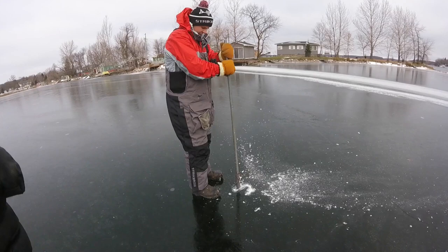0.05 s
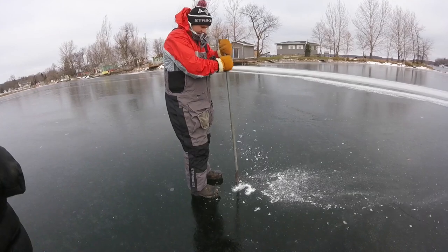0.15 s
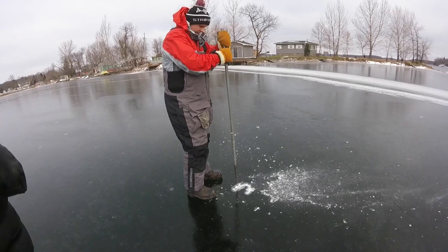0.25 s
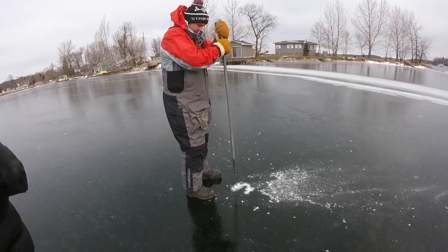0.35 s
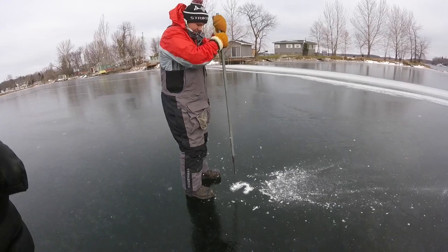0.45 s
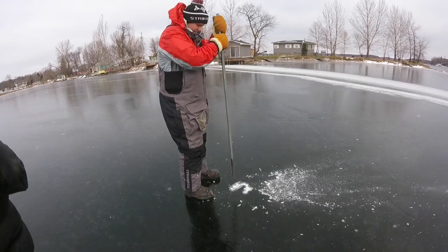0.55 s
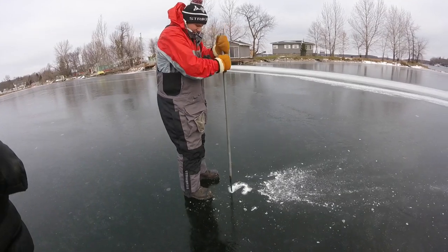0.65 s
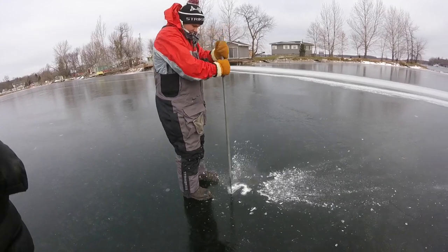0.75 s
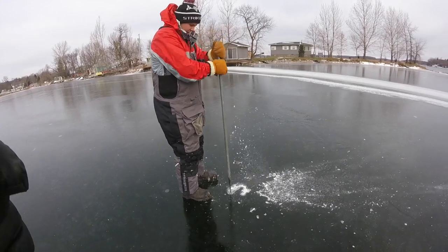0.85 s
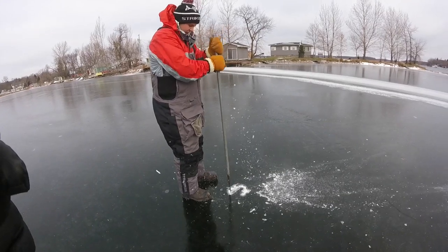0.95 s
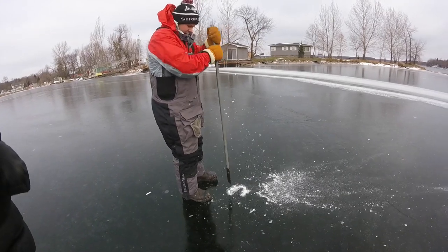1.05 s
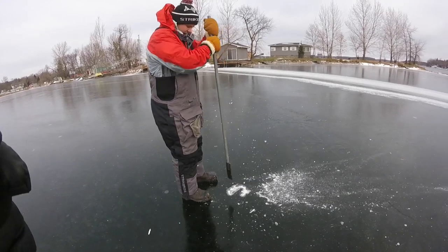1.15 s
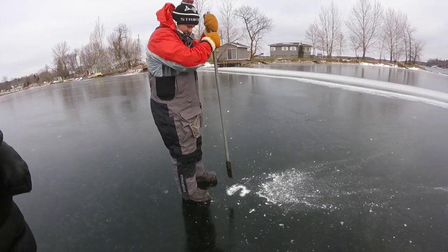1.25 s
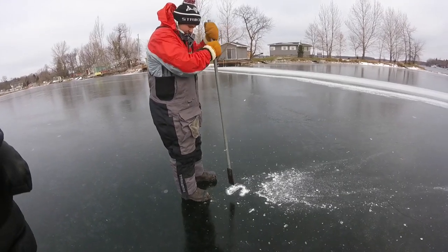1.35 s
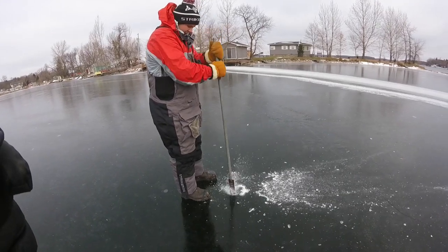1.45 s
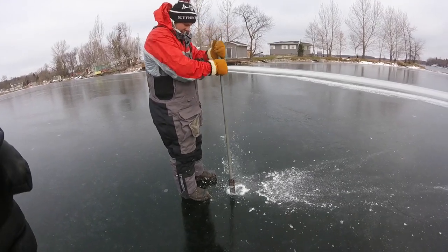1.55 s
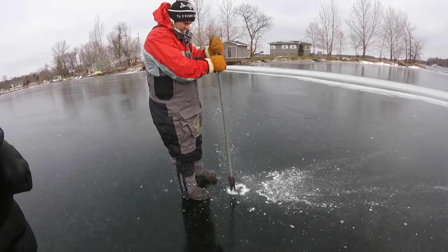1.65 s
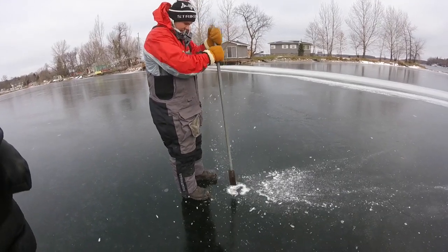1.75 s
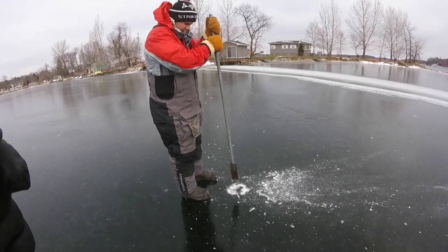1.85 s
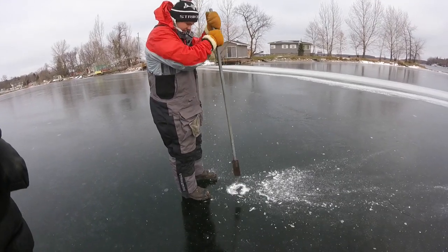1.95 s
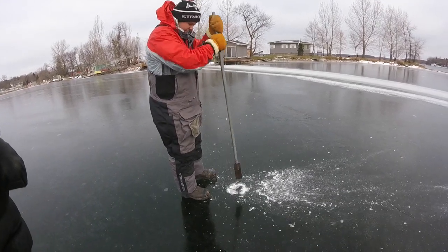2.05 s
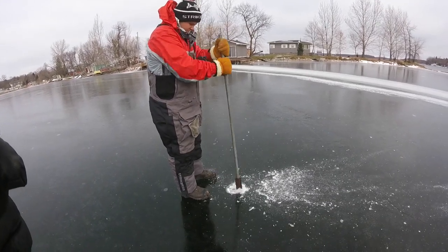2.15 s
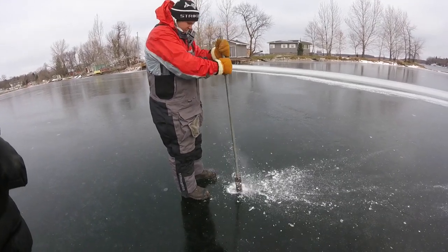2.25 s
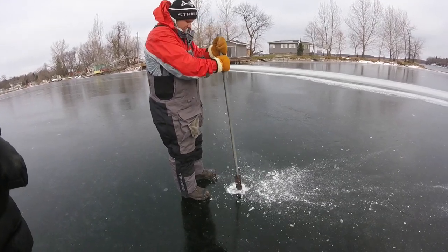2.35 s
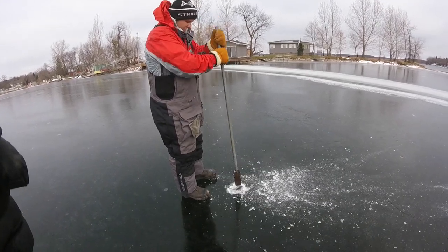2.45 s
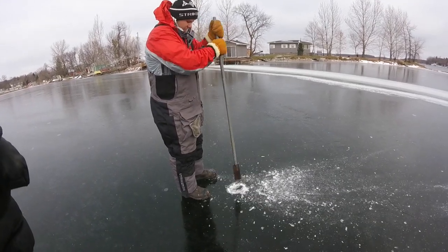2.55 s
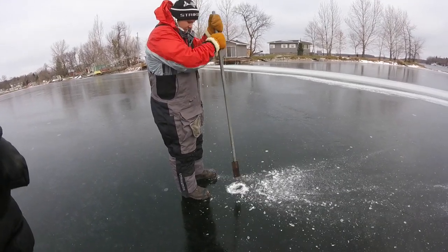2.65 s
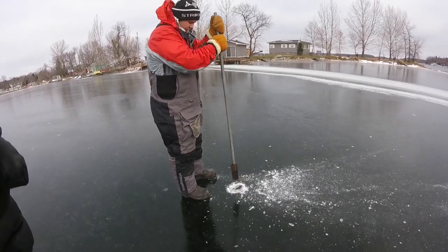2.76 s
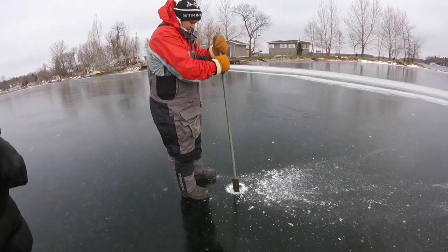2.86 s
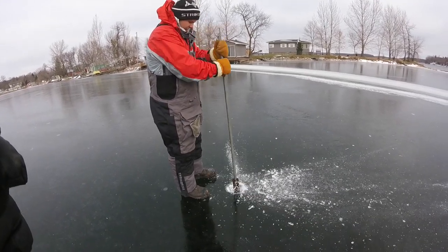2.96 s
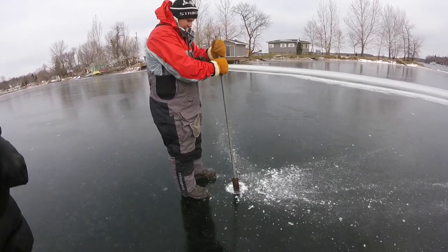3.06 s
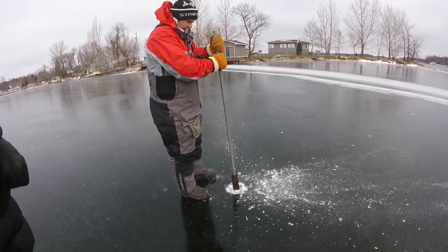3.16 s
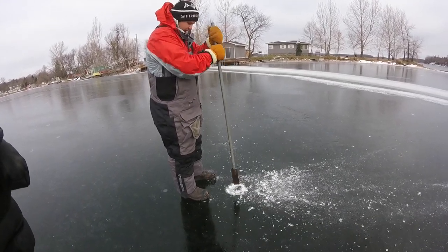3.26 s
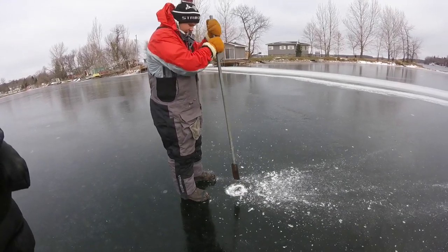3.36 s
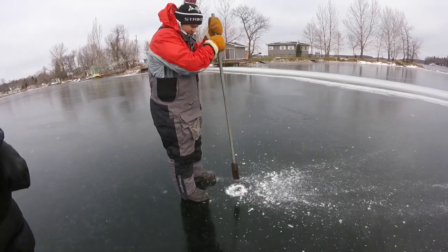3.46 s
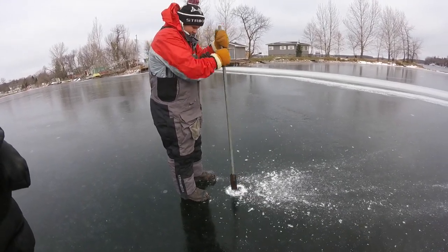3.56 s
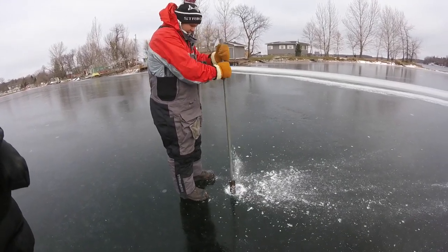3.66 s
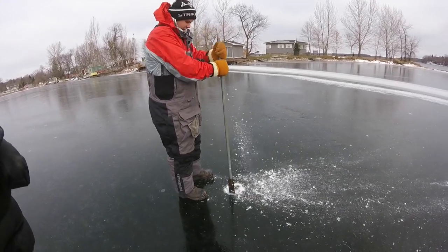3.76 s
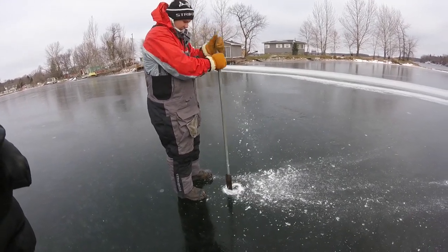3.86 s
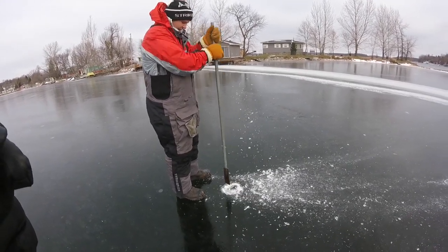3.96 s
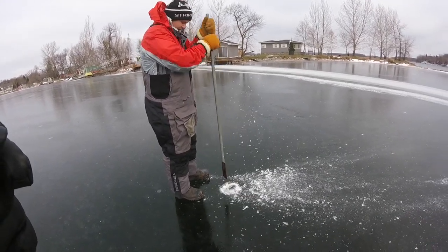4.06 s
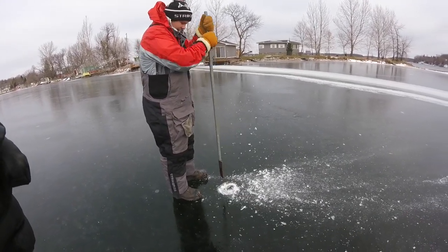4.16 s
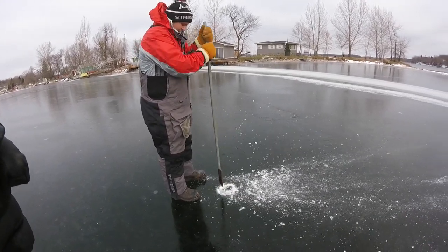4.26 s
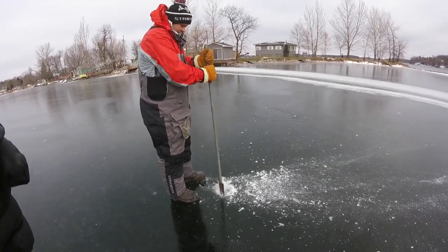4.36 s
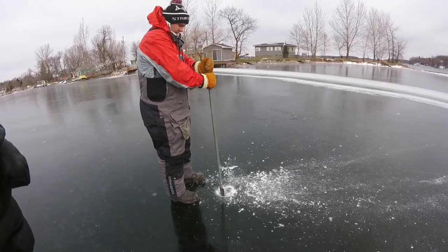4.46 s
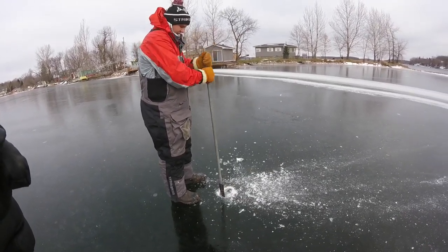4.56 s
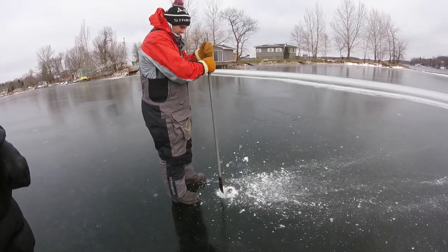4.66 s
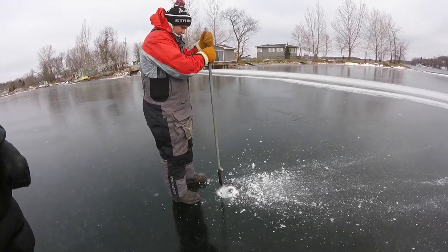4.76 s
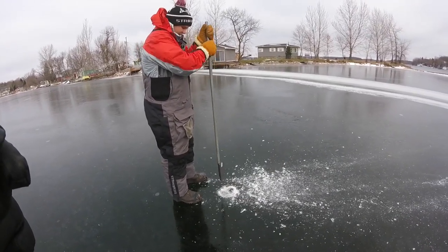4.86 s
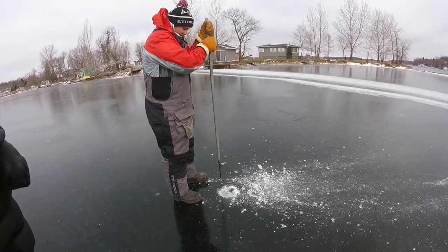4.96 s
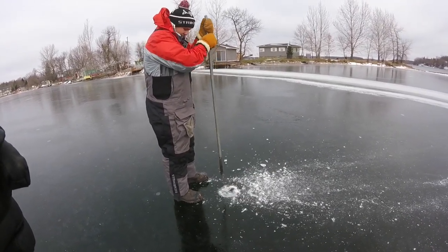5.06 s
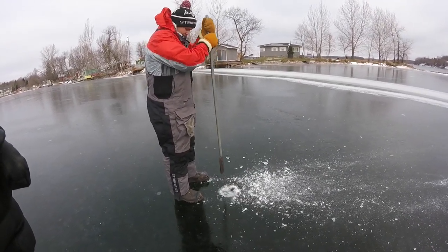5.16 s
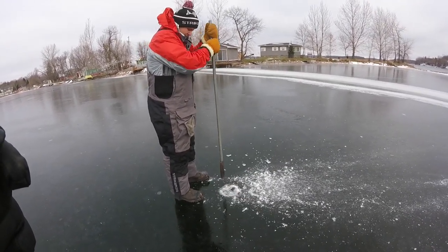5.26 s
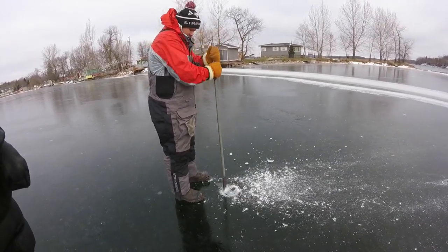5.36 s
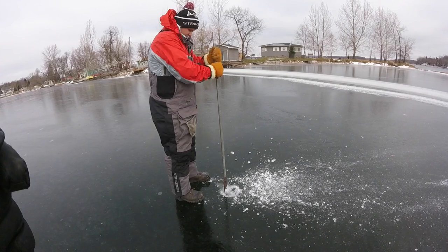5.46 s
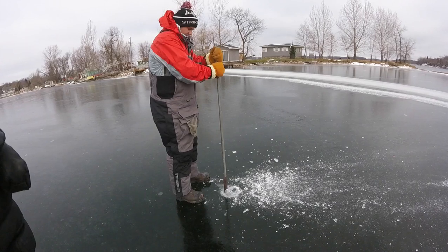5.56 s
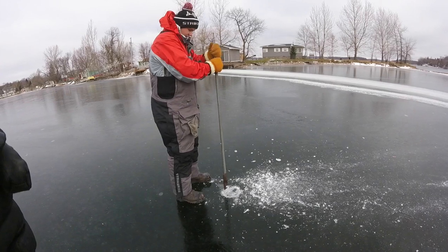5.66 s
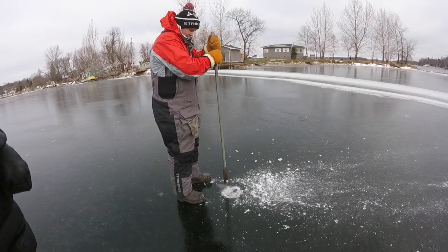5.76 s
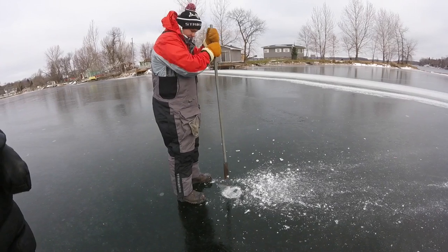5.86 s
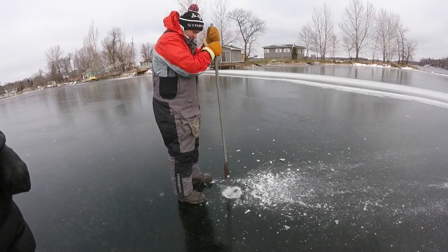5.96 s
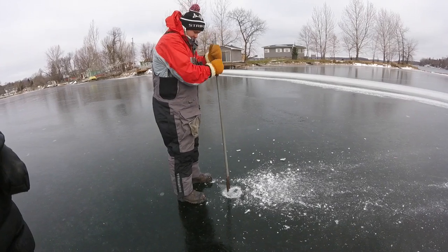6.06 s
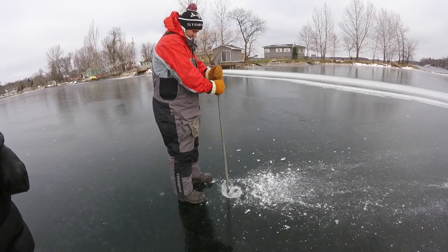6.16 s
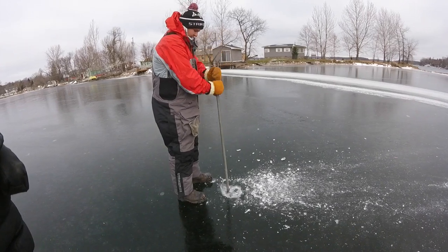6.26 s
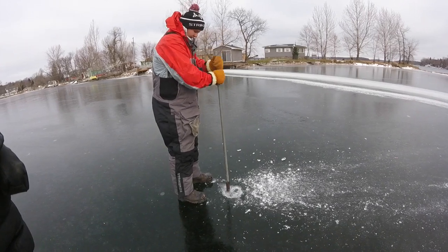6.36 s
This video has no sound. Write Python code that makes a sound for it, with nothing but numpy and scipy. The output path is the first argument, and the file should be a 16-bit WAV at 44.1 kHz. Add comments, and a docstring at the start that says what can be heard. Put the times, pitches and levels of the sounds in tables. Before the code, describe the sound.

Close outdoor sound of chopping through ice by hand: sharp, gritty double-edged cracks, short steel ring and knocking slabs, repeated regularly, with small rebound clacks after some. Fine crumbs crackle and bright chips skitter over the ice, most densely after the seventh blow. A slightly longer gap precedes the strong eighth, then one more blow. Deep wind rumble and fluttering air surround everything; the space is open and almost dry.

```python
"""On an open frozen lake someone chops a hole with a long steel chisel bar: nine blows, a few metres away.
Each blow touches, then bites twice: bursts of fracture noise crunch, ring the bar modes and thud the sheet.
Decaying modes knock as slabs crack loose; chips tick and tinkle, crumbs crackle, stiff clothing rustles.
Shaped noise makes the wind that buffets the microphone throughout, faint high hisses and a slight echo."""
import sys
import numpy as np
from scipy import signal
from scipy.fft import rfft, irfft, next_fast_len
from scipy.io import wavfile
from scipy.ndimage import uniform_filter1d, minimum_filter1d

SR = 44100
rng = np.random.default_rng(int(sys.argv[2]) if len(sys.argv) > 2 else 0)


def file_out(sig):
    """Save sig as 16-bit WAV at sys.argv[1]."""
    # one column per channel
    cols = np.atleast_2d(sig).T
    # limit, then scale
    lim = np.clip(cols, -1, 1)
    pcm = np.round(lim * 32767).astype(np.int16)
    wavfile.write(sys.argv[1], SR, pcm)


N = 283122
T = np.arange(N) / SR

# blows of the chisel: start_s, level_db, second_bite_delay_s, second_bite_rel_db, crush_s, thud_rel_db,
# treble_rel_db, crunch_rel_db, slab_rel_db, then four slab modes, strongest first: mode_hz x 4
BLOWS = [(.009, -36, .0056, -15, 0.0012, 5.5, 1, 0.93, -4, 402, 820, 1200, 1680),
         (.788, -34.5, .013, 0, 0.0041, 2, 2.5, 0, 3, 784, 994, 1500, 1700),
         (1.54, -25.5, .0096, 0, 0.007, 3, -1.5, 0, 2.5, 1168, 1107, 920, 1725),
         (2.279, -27, .005, 6, 0.0075, -3, -4, 0.88, 2.5, 1135, 970, 580, 2660),
         (2.988, -26.5, 0.0089, 0, 0.002, -2.5, -4.5, 1.3, 3.5, 1020, 857, 1210, 1650),
         (3.717, -22, .006, -5, 0.003, 2.5, -4, 2, 1.5, 993, 718, 1226, 1444),
         (4.44, -25.5, .011, 0, 0.0037, 3, 0, 2.5, -1, 980, 710, 1060, 2010),
         (5.483, -21.5, 0.012, -6, 0.013, 2.5, 2.5, 1, -2, 958, 822, 740, 1595),
         (6.196, -27.5, 0.013, 4, 0.0051, 4, 2, 0, 5.5, 1017, 613, 723, 1503)]


def undb(db):
    """Decibels to gain."""
    return 10 ** (np.asarray(db) / 20)


def unit(x):
    """Scale to rms 1."""
    return x / np.sqrt(np.mean(x ** 2) + 1e-18)


def crest(x, size=176):
    """Scale so that the loudest window of size samples has rms 1."""
    return x / np.sqrt(uniform_filter1d(x ** 2, size).max() + 1e-18)


def fade(t, t60):
    """Exponential decay, 60 dB in t60 seconds."""
    return np.exp(-np.log(1000) * t / t60)


def linger(push, decay):
    """Envelope of the energy that a push feeds into a decaying body."""
    energy = signal.fftconvolve(push ** 2, decay ** 2)[:len(push)]
    return np.sqrt(np.abs(energy))


def colour(x, points):
    """Causal minimum-phase filter through (Hz, dB) points."""
    n = next_fast_len(2 * len(x))
    hz, db = np.transpose(points)
    grid_hz = np.fft.rfftfreq(n, 1 / SR)
    gain = undb(np.interp(np.log(grid_hz + 1), np.log(hz), db))
    # fold the cepstrum onto positive time
    cepstrum = irfft(np.log(gain), n)
    cepstrum[1:n // 2] *= 2
    cepstrum[n // 2 + 1:] = 0
    response = np.exp(rfft(cepstrum))
    return irfft(rfft(x, n) * response, n)[:len(x)]


def curves(table):
    """Columns of a table joined by straight lines in time."""
    s, *columns = np.transpose(table)
    return [np.interp(T, s, c) for c in columns]


def walk(rate_hz):
    """Smooth random motion of rms 1, about rate_hz changes a second."""
    k = max(int(SR / rate_hz), 1)
    steps = rng.standard_normal(N)[np.arange(N) // k]
    return unit(uniform_filter1d(uniform_filter1d(steps, k), k))


def add(out, s, sound):
    """Mix a sound in at time s."""
    i = max(int(s * SR), 0)
    out[i:i + len(sound)] += sound[:max(N - i, 0)]


def contacts():
    """Touch and two bites per blow, plus rebounds: start_s, level_db, crush_s, thud_db, treble_db, crunch_db."""
    touch_lead_s, touch_db, touch_thud_db = 0.0028, -12.5, 6
    # the second bite meets crushed ice, which is duller
    second_thud_db, second_treble_db = -7, -1
    for s, db, delay_s, second_db, crush_s, thud_db, treble_db, crunch_db, *_ in BLOWS:
        yield s - touch_lead_s, db + touch_db, crush_s, thud_db + touch_thud_db, treble_db, crunch_db
        yield s, db, crush_s, thud_db, treble_db, crunch_db
        yield (s + delay_s, db + second_db, crush_s,
               thud_db + second_thud_db, treble_db + second_treble_db, crunch_db)
    # the bar rebounds and knocks on the wall of the hole: start_s, level_db
    knocks = [(0.036, -42), (0.055, -44.5), (0.82, -37.5), (.838, -44), (1.572, -49), (1.578, -39),
              (3.021, -38.5), (3.033, -30.5), (3.043, -34.5), (3.06, -43), (3.7558, -37), (4.506, -53)]
    knock_crush_s, knock_thud_db, knock_treble_db = 0.0025, 2, -11.5
    for s, db in knocks:
        yield s, db, knock_crush_s, knock_thud_db, knock_treble_db, 0


def chisel(bar_db=-4.5, crunch_mix_db=-3, sheet_db=-2, crunch_t60_s=0.05, sheet_t60_s=0.084, grain_db=7.0,
           snap=0.97, rise_s=0.0017, grip=0.0068, patchy_db=3.5, scatter_treble_db=-5, size=11025):
    """Each contact is a burst of tiny fractures that crunches, rings the bar and thuds through the sheet."""
    # steel bar modes, damped by mittens and ice: mode_hz, level_db, t60_s
    bar_modes = [(1380, -6.5, .023), (1680, -6, .05), (1922, -14, 0.078), (2250, -19, .08),
                 (2650, -10, 0.059), (3220, -10.5, 0.053), (3570, -4.5, 0.062), (3880, -12, .05),
                 (4100, -13, 0.031), (5110, -9.5, 0.046), (5310, -5.5, 0.022), (5790, 1.5, 0.048),
                 (5950, -3.5, 0.03), (5950, -4, 0.046), (6485, -6, .032), (7350, -16, 0.035),
                 (7750, -12, .05), (8330, -18, .08), (9200, -22, .08), (10000, -23, 0.052),
                 (10600, -16.5, .075), (11700, -23.5, 0.082), (11900, -22, .12), (11800, -23, .11),
                 (12200, -17, .09), (13400, -24, .07), (13900, -24.5, .07), (14500, -22.5, .07)]
    # colour of breaking ice: freq_hz, level_db
    crunch_colour = [(500, -9), (1400, 4), (2100, -2.5), (2700, 4), (3100, -5.5), (3700, 4.5), (4750, -6.5),
                     (5900, 2), (6900, -5), (8900, -10.5), (12000, -7), (15000, -10.5)]
    # colour of the flexing sheet: freq_hz, level_db
    sheet_colour = [(100, -24.5), (230, -3), (360, 3.5), (530, -8.5), (760, -3), (1120, -1), (1350, -8.5),
                    (2200, -15), (5000, -50)]
    out, t = np.zeros(N), T[:size]
    hz, mode_db, t60_s = np.transpose(bar_modes)[:, :, None]
    for s, db, crush_s, thud_db, treble_db, crunch_db in contacts():
        noise = rng.standard_normal((4, size))
        pressure = np.clip(t / rise_s, 0, 1) * np.exp(-(t / crush_s) ** 3)
        fractures = crest(pressure * noise[0] * undb(grain_db * noise[1]))

        # the grip shifts the modes a little, and every contact meets them with other signs
        shifted_hz = hz * (1 + grip * rng.standard_normal(hz.shape))
        modes = undb(mode_db) * np.sin(2 * np.pi * shifted_hz * t) * fade(t, t60_s)
        signs = rng.choice([-1, 1], len(bar_modes))
        ring = signal.fftconvolve(fractures, signs @ modes)[:size]

        # cracks scatter on through the ice and lose their treble
        scatter = noise[2] * linger(pressure, fade(t, crunch_t60_s))
        scatter = colour(scatter, [(6000, 0.012), (9000, scatter_treble_db)])
        # every contact breaks with its own colour
        patchy = [(f, level + patchy_db * rng.standard_normal()) for f, level in crunch_colour]
        crunch = colour(snap * fractures + crest(scatter), patchy)

        thud = colour(noise[3] * linger(pressure, fade(t, sheet_t60_s)), sheet_colour)
        bite = undb(bar_db) * crest(ring)
        bite += undb(crunch_mix_db + crunch_db) * crest(crunch)
        bite += undb(sheet_db + thud_db) * crest(thud)
        # brittle ice breaks brighter than packed crumbs
        add(out, s, undb(db) * colour(bite, [(4500, 0.0021), (10000, treble_db)]))
    return out


def slabs(lag_s=0.0015, rise_s=0.0063, slab_t60_s=0.044, drum_t60_s=0.048, size=6615):
    """Each blow cracks a slab loose, which knocks in four decaying modes, while the sheet drums below."""
    # slab modes, strongest first: level_db
    slab_mode_db = (1.5, -0.5, -6.5, -6.5)
    # drumming of the ice sheet: mode_hz, thud_rel_db
    drum_modes = [(305, -10), (430, -6.5)]
    out, t = np.zeros(N), T[:size]
    rise = np.minimum(t / rise_s, 1)

    def mode(hz, mode_db):
        """Steady sine at a random phase."""
        return undb(mode_db) * np.sin(2 * np.pi * (hz * t + rng.random()))

    for s, db, _, _, _, thud_db, _, _, slab_db, *modes_hz in BLOWS:
        ring = sum(mode(hz, mode_db) for hz, mode_db in zip(modes_hz, slab_mode_db))
        drum = sum(mode(hz, mode_db) for hz, mode_db in drum_modes)
        add(out, s + lag_s, undb(db + slab_db) * crest(rise * fade(t, slab_t60_s) * ring))
        add(out, s, undb(db + thud_db) * rise * fade(t, drum_t60_s) * drum)
    return out


def chips(chip_db=-8.5, ring_t60_s=0.046, tick_t60_s=0.017, touch_s=0.0023, grain_db=5.0,
          below_db=-4, above_db=-14, size=3087):
    """A chip scuffs the ice with a gritty tick, strongest near its own pitch, and tinkles briefly."""
    # largest chips, levels before chip_db: touch_end_s, level_db, pitch_hz, ring_rel_tick_db
    landings = [(1.251, -55.5, 3000, -3), (1.384, -52, 12200, -5), (1.476, -45.5, 6240, -14),
                (1.838, -50, 3970, -5), (1.85, -42, 7400, -4), (1.993, -51, 5060, -13),
                (2.179, -52, 6400, -11), (2.206, -46.5, 11900, -8), (2.483, -51, 12300, -8),
                (2.733, -49.5, 8300, -7), (2.789, -45, 5400, -12), (2.838, -50, 6400, -5),
                (2.873, -47, 12100, 0), (2.94, -48, 12000, -8), (3.304, -49.5, 7500, -3.5),
                (3.454, -51.5, 10600, -12), (3.513, -44.5, 5560, -5), (4.574, -47, 4700, -8),
                (4.586, -50, 5530, -6), (4.611, -54, 6200, 6), (4.652, -44, 3880, -8),
                (4.668, -44, 5800, -4), (4.710, -61, 4300, -8), (4.738, -51, 5000, -11),
                (4.752, -55, 13700, 4), (4.868, -50, 7900, -8), (4.902, -40.5, 10130, 1),
                (4.917, -44, 6230, -12), (4.931, -48, 5630, -8), (4.963, -52, 7540, 0),
                (5.008, -53, 10400, 8), (5.026, -52, 7400, -7), (5.053, -50, 10400, -2),
                (5.075, -49, 3930, -5), (5.176, -51, 8150, -8), (6.012, -49.5, 4070, -7),
                (6.335, -50, 5840, 8)]
    grit_colour = [(800, -9), (3000, -4), (7300, -3), (9000, -4), (11000, 0.5), (14000, -4.5), (16000, -25)]
    out, t = np.zeros(N), T[:size]
    for s, db, hz, ring_db in landings:
        noise = rng.standard_normal((2, size))
        grit = colour(noise[0] * undb(grain_db * noise[1]) * fade(t, tick_t60_s), grit_colour)
        tick = crest(colour(grit, [(hz / 2, below_db), (hz, 0), (hz * 2, above_db)]), size=88)
        ring = undb(ring_db) * np.sin(2 * np.pi * hz * t) * fade(t, ring_t60_s)
        chip = np.minimum(t / touch_s, 1) * (tick + ring)
        add(out, s - touch_s, undb(db + chip_db) * crest(chip, size=44))
    return out


def lake(x, echo_db=-36, t60_s=0.36):
    """Faint scatter from the wide ice and the shore: convolution with coloured, decaying noise."""
    noise = rng.standard_normal(SR) * fade(T[:SR], t60_s)
    tail = colour(noise, [(300, 47.5), (6000, -20), (14000, -8.5)])
    echo = signal.fftconvolve(x, tail / np.linalg.norm(tail))[:N]
    return x + undb(echo_db) * echo


def skitter(crumbs_per_s=600, spread_db=6.0, crumb_t60_s=0.012, size=441, kinds=10):
    """Showers of crumbs crackle over the ice at random instants; each kind has its own dry noise tick."""
    # showers: start_s, length_s, level_db
    showers = [(.95, 0.37, -77.5), (1.314, 0.18, -75), (1.652, 0.28, -75.5), (1.872, 0.26, -73),
               (2.598, 0.13, -74), (2.762, 0.24, -69), (3.35, 0.33, -73.5), (3.92, 0.47, -76.5),
               (4.552, .09, -65.5), (4.645, 0.15, -67), (4.76, .4, -73), (5.8, .12, -79.5),
               (6.262, 0.11, -74.5)]
    crumb_colour = [(800, -4.5), (2200, 2), (3800, -4.5), (7000, -4), (8800, -10.5), (11500, -6),
                    (15000, -18.5)]
    out, t = np.zeros(N), T[:size]
    for s, length_s, db in showers:
        n, shower = int(length_s * SR), 0
        for _ in range(kinds):
            chance = rng.random((SR // 2, 2))[:n]
            lands = chance[:, 0] < crumbs_per_s / kinds / SR
            landings = lands * undb(-spread_db * np.log(chance[:, 1] + .04))
            tick = rng.standard_normal(size) * fade(t, crumb_t60_s)
            shower = shower + signal.fftconvolve(landings * signal.windows.tukey(len(landings), .3), tick)
        add(out, s, undb(db) * unit(colour(shower, crumb_colour)))
    return out


def clothing(creases_per_s=1000, spread_db=6.5, rustle_db=0):
    """Stiff winter fabric creases in a run of small dull crackles: random impulses, filtered."""
    # rustles: start_s, length_s, level_db, centre_hz
    rustles = [(.1, 0.33, -64, 2280), (.42, 0.33, -66.5, 2000), (1.19, 0.08, -62, 1850),
               (2.024, 0.066, -64, 1385), (2.45, .25, -77, 2220), (2.783, .027, -40.5, 1024),
               (3.534, 0.07, -60.5, 2040), (4.07, 0.06, -56.5, 2070), (4.56, 0.28, -61, 1700),
               (5.099, 0.037, -56, 2000), (5.09, 0.27, -66, 2350), (5.945, 0.024, -47.5, 1200),
               (6.315, 0.039, -63.5, 2600)]
    out = np.zeros(N)
    for s, length_s, db, hz in rustles:
        n = int(length_s * SR)
        chance = rng.random((SR, 2))[:n]
        creases = (chance[:, 0] < creases_per_s / SR) * undb(-spread_db * np.log(chance[:, 1] + 0.022))
        run = np.pad(creases * signal.windows.hann(n), (0, SR // 200))
        fabric = [(hz / 6, -25), (hz / 2, -3), (hz, 0), (1.4 * hz, -2), (1.26 * hz, -13),
                  (4 * hz, -30), (8 * hz, -48)]
        add(out, s, undb(db + rustle_db) * unit(colour(run, fabric)))
    return out


def high_hiss(grain_db=1.5):
    """A faint high grainy hiss swells in smooth envelopes, mostly around the blows: coloured noise."""
    # swells of the hiss: start_s, length_s, level_db
    hiss_swells = [(0.622, 0.32, -72), (1.48, .045, -72), (2.186, 0.36, -69.5), (3.634, .22, -74),
                   (4.46, 0.12, -70), (5.3, 0.25, -72), (6.11, .13, -76)]
    envelope = np.zeros(N)
    for s, length_s, db in hiss_swells:
        add(envelope, s, undb(db) * signal.windows.tukey(int(length_s * SR), .6))
    hiss = colour(rng.standard_normal(N), [(2000, -7.0), (4500, -1.5), (6200, 2.5), (8800, -9.5),
                                           (12000, 0.0), (15000, -16.5)])
    return envelope * undb(grain_db * walk(150)) * unit(hiss)


def wind(buffet_db=-2, eddy_db=-5, rush_db=5.5, hiss_db=-26.5, hiss_growth=1.3, eddy_rate_hz=40,
         flutter_db=2.0, flicker_db=4.0):
    """Turbulence thumps the microphone; shed eddies throb, and the rush and hiss flutter with the pressure."""
    # gusts: time_s, level_db
    gusts = [(0.0, -21), (1.35, -23), (1.47, -21), (1.53, -25.5), (1.88, -25), (2.05, -16.5), (2.32, -31.5),
             (2.66, -17.5), (2.79, -24), (2.93, -17.5), (2.99, -23.5), (3.85, -22), (4.0, -17.5),
             (4.62, -22.5), (4.71, -16.5), (4.9, -21), (5.02, -18.5), (5.18, -22), (5.3, -17.5),
             (5.72, -25.5), (5.87, -17.5), (5.94, -21), (6.29, -24.5), (6.35, -21.5), (6.42, -20.5)]
    # passing air, before rush_db and hiss_db: time_s, level_db
    airflow = [(0.0, -38.5), (.6, -41.5), (.85, -39), (1.05, -40), (1.25, -37.5), (1.45, -43.5),
               (1.65, -39.5), (1.92, -48), (2.05, -39), (2.13, -44.5), (2.4, -43.5), (2.6, -38.5),
               (2.72, -42.5), (2.97, -38.5), (3.28, -47), (3.55, -38), (3.95, -41.5), (4.12, -37.5),
               (4.35, -40), (4.62, -41), (4.75, -40), (5.2, -35.5), (5.68, -44), (6.03, -38.5), (6.42, -43)]
    # eddy shedding: time_s, shedding_hz
    shedding = [(0, 106), (1.4, 69), (2.1, 77.87), (4.7, 52.98), (6.42, 67.76)]
    # wind colours: freq_hz, level_db
    buffet_colour, rush_colour, hiss_colour = [(10, -7), (25, 4), (42, 2), (70, -3.5), (120, -6.5),
                                               (170, -14.5), (260, -22), (500, -36), (1200, -95)], [(80, 9), (180, 6), (300, 1.5), (420, 0),
                                                               (600, -3.5), (850, -4.5), (1120, -9),
                                                               (1400, -22), (2000, -35.5), (4000, -66)], [(700, -17.5), (1500, 10),
                                                                             (2200, 0.5), (2900, -0.5),
                                                                             (3600, -9), (5000, -31),
                                                                             (9000, -45.5)]
    low_db, = curves(gusts)
    mid_db, = curves(airflow)
    shed_hz, = curves(shedding)
    phase = 2 * np.pi * np.cumsum(shed_hz) / SR
    eddies = unit(walk(eddy_rate_hz) * np.sin(phase) + walk(eddy_rate_hz) * np.cos(phase))
    buffet, rush, hiss = (unit(colour(rng.standard_normal(N), c))
                          for c in (buffet_colour, rush_colour, hiss_colour))
    pressure = undb(buffet_db) * buffet + undb(eddy_db) * eddies
    # level over an eighth of a second, so the gust alone sets the strength
    pressure /= np.sqrt(uniform_filter1d(pressure ** 2, SR // 8))
    flutter = undb(flutter_db * (0.13 * pressure + walk(55)))
    # the hiss swells and sinks further than the rush, and flickers
    mean_db = mid_db.mean()
    high_db = mean_db + hiss_growth * (mid_db - mean_db) + flicker_db * walk(110)
    air = undb(mid_db + rush_db) * rush + undb(high_db + hiss_db) * hiss
    return undb(low_db) * pressure + flutter * air


def hush(level_db=-77, swell_db=4.5):
    """A faint high hush: coloured noise that slowly swells and sinks."""
    air = colour(rng.standard_normal(N), [(1500, -6.5), (4000, 1.5), (6300, -1), (7800, -2.5),
                                          (8800, -10.0), (12000, -6.0), (15000, -17.5)])
    return undb(level_db + swell_db * walk(1.3)) * unit(air)


def scene():
    """Blows and chips with the lake's echo, then crumbs, clothes, wind, hiss and hush without it."""
    ice = lake(chisel() + slabs() + chips())
    return (ice + skitter() + hush() + high_hiss() + clothing() + wind())[None]


def record(dry, ceiling=.34, top_hz=15250, size=66):
    """A fast limiter holds the loudest peaks down; a steep low-pass cuts the top."""
    allowed = ceiling / np.maximum(np.abs(dry), ceiling)
    limited = dry * uniform_filter1d(minimum_filter1d(allowed, size), size)
    low_pass = signal.ellip(8, .2, 70, top_hz, fs=SR, output="sos")
    return signal.sosfilt(low_pass, limited)


dry = scene()
out = record(dry)
file_out(out)
```